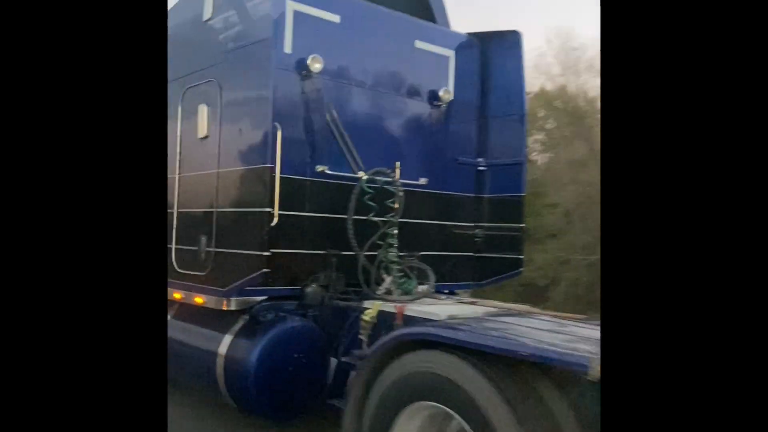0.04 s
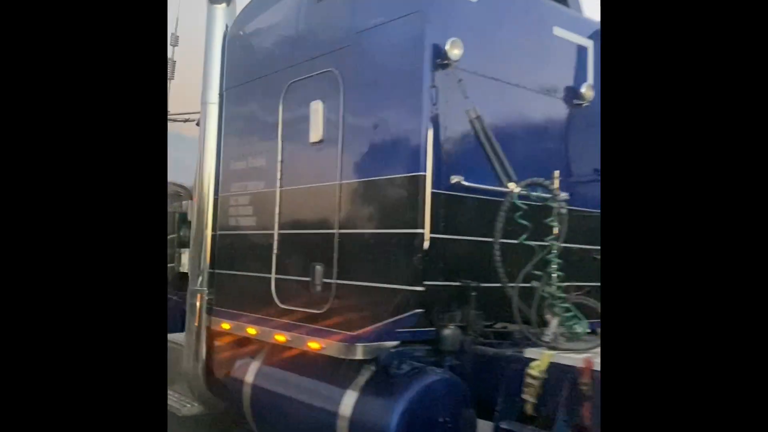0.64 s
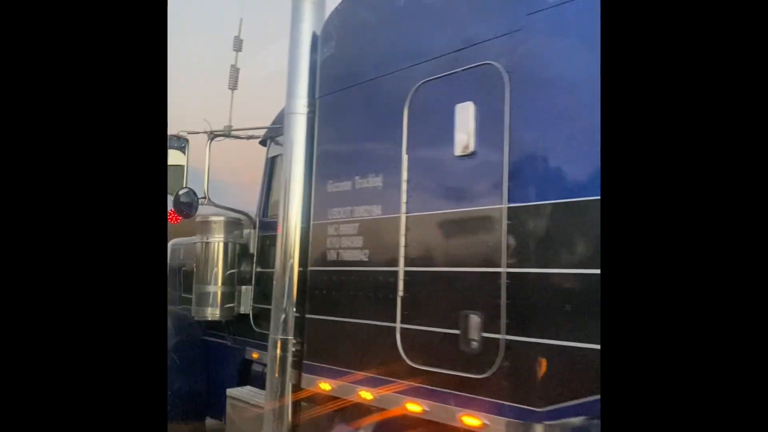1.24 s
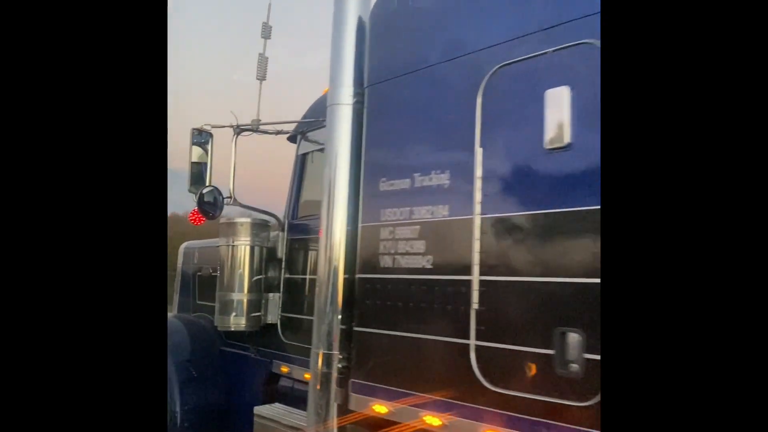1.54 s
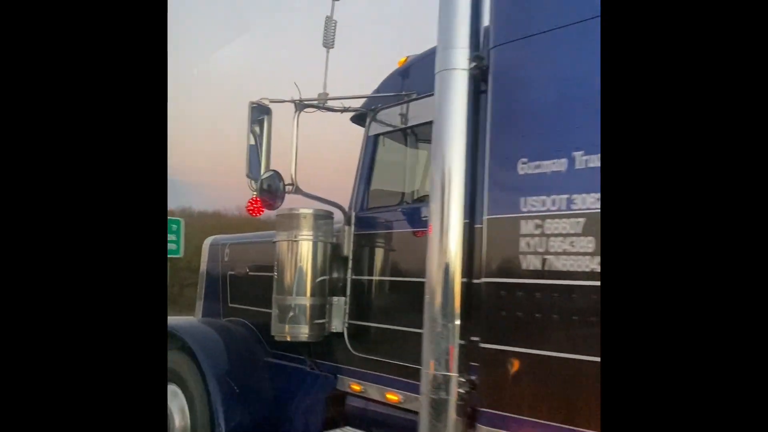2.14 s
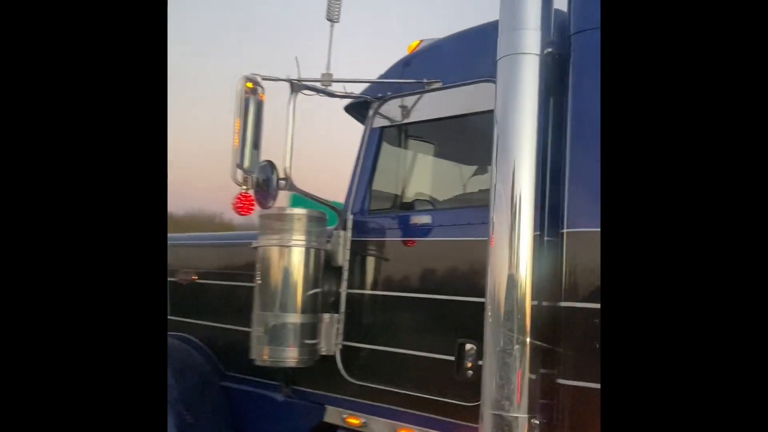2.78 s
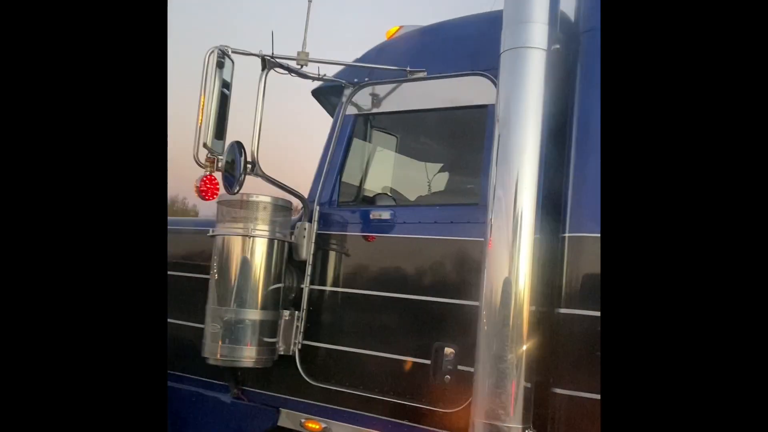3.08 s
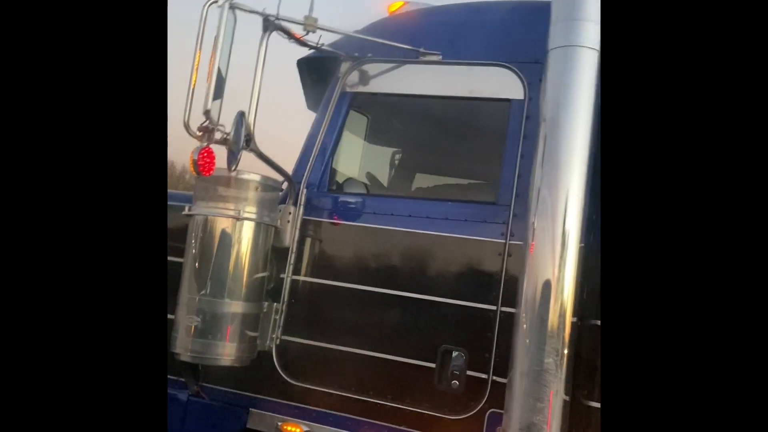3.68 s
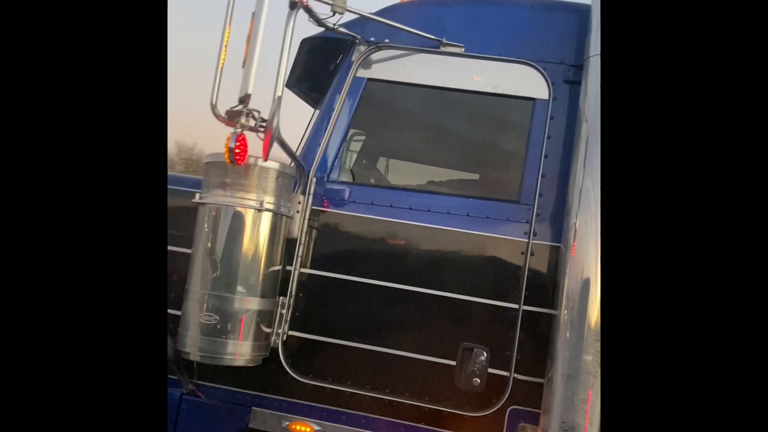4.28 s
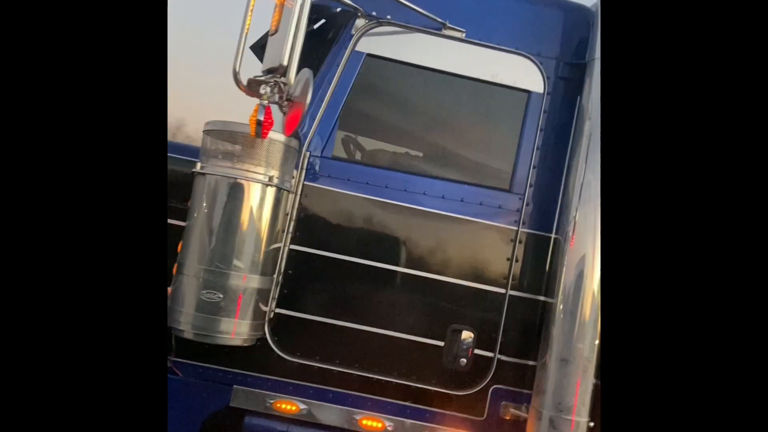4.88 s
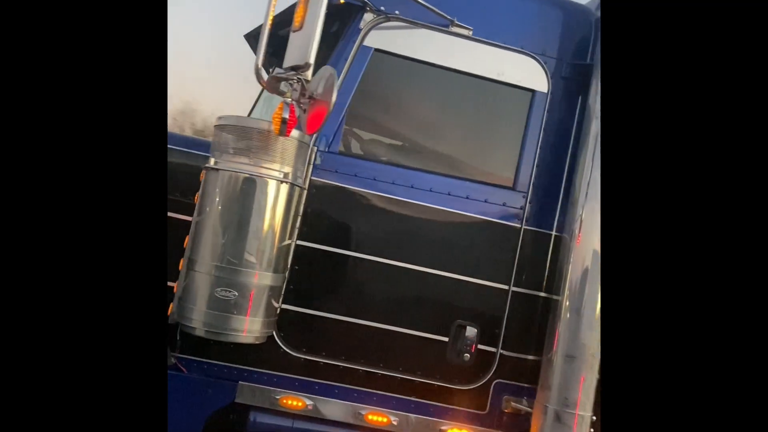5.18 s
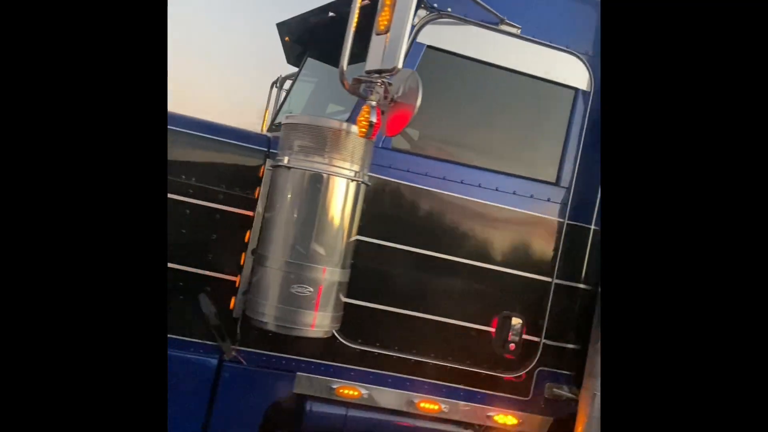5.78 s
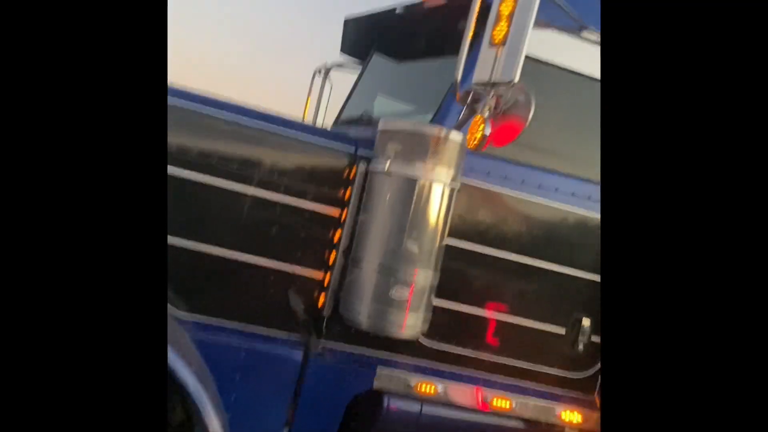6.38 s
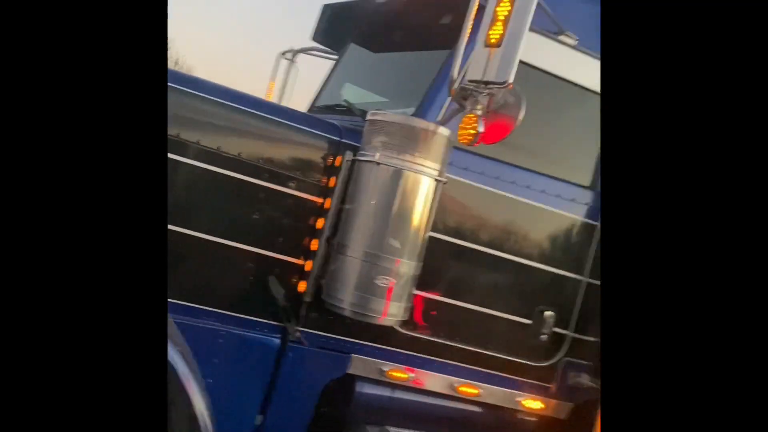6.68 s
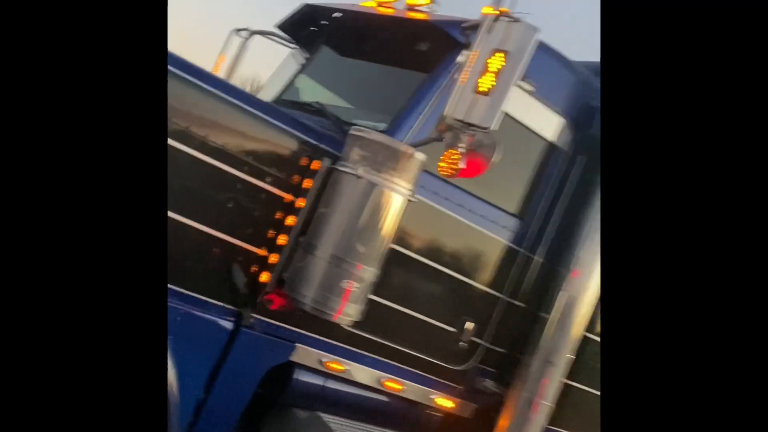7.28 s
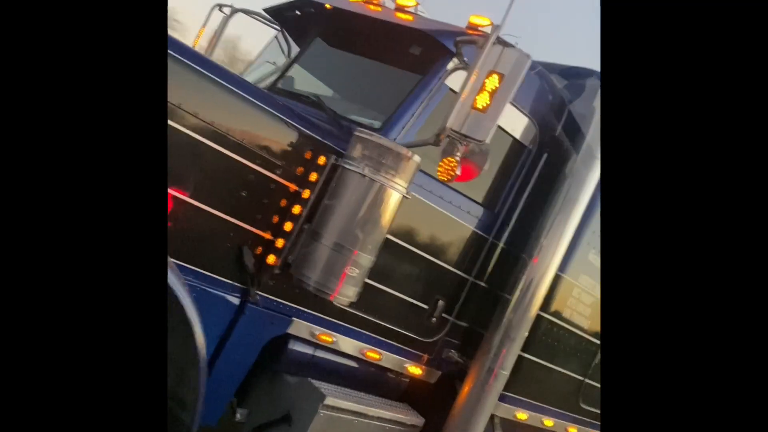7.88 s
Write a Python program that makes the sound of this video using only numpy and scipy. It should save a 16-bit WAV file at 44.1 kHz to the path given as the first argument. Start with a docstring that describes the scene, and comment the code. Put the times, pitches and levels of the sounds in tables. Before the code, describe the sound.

From inside a car at highway speed, low road rumble, tyre roar and wind mix with the steady exhaust drone of a truck close by. A faint turbo whistle rises and the truck's tyre howl drops behind. Then its air horn sounds two loud, rasping blasts, a long one and a shorter one in quick succession, with the engine and road still running underneath.

```python
"""A diesel truck runs alongside on a highway, heard from a moving car. From the start its exhaust drones
over tyre roar and wind while the turbo whistle climbs; small squeaks, chirps and later ticks sound in
the car. After 3 s the howl of the drive tyres drops behind. At 5.4 s and 6.9 s the driver pulls the air
horn: three reed trumpets sound a chord whose partials swell and fade as the paths between the vehicles
shift. Meanwhile the turbo runs down and the road noise eases."""
import sys
import numpy as np
from scipy import signal
from scipy.fft import irfft, next_fast_len
from scipy.io import wavfile
from scipy.ndimage import uniform_filter1d

SR = 44100
rng = np.random.default_rng(int(sys.argv[2]) if len(sys.argv) > 2 else 0)


def transcribe(u):
    """Save the signal u as a 16-bit wav file named by the first command-line argument.

    u: samples, shape (n,) or (channels, n), limited to [-1, 1]; the rate is SR.
    q: integer samples, one column per channel.
    """
    v = np.clip(np.atleast_2d(u).T, -1, 1)
    q = np.round(v * 32767).astype(np.int16)
    wavfile.write(sys.argv[1], SR, q)


N = 358533
TIME = np.arange(N) / SR
FREQS = np.maximum(np.fft.rfftfreq(next_fast_len(N, True), 1 / SR), 1)

LOW_HZ, MID_HZ, HIGH_HZ = 319.9, 386.3, 489.9  # the three trumpets
ABREAST_S = 6.1  # the horns are level with the car

# Table levels are relative: each source applies further gains.
# horn blasts: (valve opens [s], valve shuts [s], softness of the start [0-1])
BLASTS = [(5.411, 6.739, 0.95), (6.949, 7.746, .05)]
# the car crosses one lobe or null of each low partial's field; a row per partial, lowest first:
# (level outside [dB], gain at centre [dB], centre time [s], half-length [s])
LOW_PARTIALS = [(-26, -13, 7.71, 0.63), (-46, 14, 6.5, 0.37), (-33.5, -6.5, 6.72, 0.29),
                (-45.5, 10, 5.8, 0.5), (-50, 6, 6.05, 0.93)]
MID_PARTIALS = [(-17.5, 4, 6.09, .62), (-28.5, -11, 6.91, 0.52), (-47, 16.5, 5.81, 0.4),
                (-36, -15.5, 6.6, 0.16)]
HIGH_PARTIALS = [(-23, -4, 6.58, .37), (-33.5, 7, 5.97, 0.44), (-37.5, -4.5, 7.75, 0.44)]
# spectral envelopes of the upper partials: (frequency [Hz], level [dB])
LOW_BRASS = [(1920, -6), (2240, -11.5), (2560, -13.5), (2880, -19), (3200, -16), (3520, -22.5), (3830, -19),
             (4160, -23.5), (4500, -27.5), (6000, -32), (7400, -45.5)]
MID_BRASS = [(1930, -4.5), (2320, -8.5), (2700, -13), (3100, -23), (3470, -18), (3860, -14), (4250, -22.5),
             (4630, -27.5), (5800, -39.5), (7400, -51)]
HIGH_BRASS = [(1960, -6), (2450, -7), (2940, -8.8), (3430, -19), (3920, -16.5), (4400, -24), (5400, -27.5),
              (7400, -46)]
# bands of partials that briefly swell or fade:
# (frequency [Hz], half-width [Hz], gain [dB], centre time [s], half-length [s])
HORN_SWELLS = [(320, 30, 3.5, 7.0, .08), (386, 25, 2, 6.0, .12), (490, 30, 0, 5.8, .12),
               (490, 30, 1.5, 7.3, .15), (772, 50, -6, 5.92, 0.15), (772, 50, 0, 5.65, .2),
               (772, 50, -4.5, 6.52, .07), (772, 50, 2.5, 7.62, .15), (970, 70, -10, 5.45, 0.067),
               (970, 70, -7, 5.94, .07), (970, 70, 3, 6.28, 0.11), (970, 70, 3, 7.3, 0.073),
               (970, 70, -5, 7.67, 0.13), (1278, 50, 5, 7.63, .13), (1460, 35, -4.5, 5.52, .07),
               (1471, 35, -7, 6.13, .06), (1471, 35, -5, 8.2, .1), (1471, 35, 6, 7.07, .06),
               (1471, 35, -4.5, 7.23, .04), (1540, 50, -10, 5.1, 0.099), (1575, 45, -4.5, 9.5, .07),
               (1550, 50, -8, 7.35, 0.48), (1900, 300, 3.5, 5.52, 0.21), (1940, 150, -4.5, 5.7, 0.12),
               (1940, 100, 4.5, 6.53, 0.15), (1940, 120, 4, 7.72, .05), (2410, 200, -3, 5.46, .1),
               (2450, 60, 4.5, 6.5, .06), (2630, 100, 0.5, 5.98, .13), (2330, 120, -2, 7.1, 0.14),
               (2250, 70, 7.5, 7.35, .4), (2450, 60, 10, 7.6, .22), (2820, 190, 6, 7.55, .22),
               (3880, 110, -5.5, 7.1, .65), (4900, 1200, 2.5, 5.8, .35)]
# air rushing through the horns: (frequency [Hz], density level [dB])
RASP_SPECTRUM = [(200, -46.5), (500, -33.5), (700, -19), (880, -30), (1400, -29.5), (1750, -36.5),
                 (2150, -35.5), (2700, -38.5), (3400, -45.5), (4300, -46.5), (4900, -52.5), (5900, -53),
                 (7200, -68), (8000, -83.5), (15000, -89)]
# crankshaft speed: (time [s], rate [turns/s])
CRANK_SPEED = [(0, 24.8), (1.2, 24), (3.3, 23.8), (4.3, 24), (5.2, 24.2), (6.2, 24.42), (7.2, 24.3),
               (8.1, 24.1)]
# exhaust drone: (time [s], level [dB])
DRONE_LEVEL = [(0, -25), (1.2, -18.5), (4.2, -18), (5.3, -17), (6.4, -18.5), (8.1, -19)]
# engine orders, swelling as their lobes sweep over the car:
# (multiple of crank rate [1], level [dB], gain at centre [dB], centre time [s], half-length [s])
ENGINE_ORDERS = [(3, -17, 1.5, 2.5, 1), (5, -20.5, 4, 3.3, 1), (6, 0.5, 0, 4, 4),
                 (9, -24.5, 13, 3.15, 0.69), (10, -21.5, 10, 4.3, 1.8), (29, -31.5, 7.5, 1.3, 2.3)]
# turbo whistle: (time [s], frequency [Hz], level [dB])
TURBO_WHISTLE = [(0, 5300, -84), (1.0, 5450, -77.5), (2.2, 5660, -72.5), (3.08, 5776, -75),
                 (3.2, 5795, -63), (3.33, 5830, -76), (3.7, 5900, -78), (4.2, 5980, -79),
                 (4.5, 6020, -70.5), (5.6, 6287, -75), (6.5, 6050, -79.5), (8.1, 5520, -85)]
# road noise: (time [s], cabin rumble level [dB], tyre roar level [dB])
ROAD_LEVELS = [(0, 0.5, 1.6), (2.2, 0.7, 1.9), (3.2, 0.2, 0.85), (5.3, .5, 1.04), (6.1, -0.5, -3),
               (6.85, -3.5, -3.5), (8.1, -4, -4)]
# cabin rumble, tyre roar and wind: (frequency [Hz], density level [dB])
RUMBLE_SPECTRUM = [(15, -70), (25, -56.5), (42, -49), (58, -43.5), (75, -41.5), (90, -43.5), (112, -41.5),
                   (130, -47), (175, -45), (250, -47), (310, -54), (400, -61.5), (800, -88), (2000, -130)]
ROAR_SPECTRUM = [(120, -81.5), (320, -63.5), (400, -55.5), (470, -60), (620, -57.5), (710, -57.5),
                 (830, -63.5), (950, -66.5), (1100, -68.5), (1400, -74.5), (1750, -78.5), (2600, -91.5),
                 (6000, -130)]
WIND_SPECTRUM = [(300, -97.5), (1400, -74), (2100, -80.5), (2700, -80), (3400, -82), (4200, -89),
                 (5000, -94.5), (5700, -93), (6100, -100), (6600, -102), (7300, -109), (8200, -120),
                 (10000, -119), (11500, -123), (15000, -127)]
# howl of the truck's drive tyres: (time [s], level [dB])
HOWL_LEVEL = [(0, -45.5), (.9, -37), (3, -39), (4.2, -49), (8.1, -53.5)]
# tread tones: (frequency [Hz], width [Hz], level [dB], level slope [dB/s])
TREAD_TONES = [(551, 18, -37, -0.22), (707, 24, -43, -1.5), (806, 26, -44, -.5), (907, 12, -47.5, -1.1),
               (1016, 14, -50, -0.5), (1193, 24, -51, -0.2), (1402, 36, -56, -1.5)]
# their common drift: (time [s], pitch factor [1])
TREAD_PITCH = [(0, 0.99), (1.8, 1.02), (2.8, .997), (8.1, 1.01)]
# ticks: (time [s], level [dB], frequency [Hz], relative width [1], decay [s], left minus right [dB])
TICKS = [(4.157, -29.5, 4400, 0.14, 0.0023, 3), (4.159, -32, 6040, 0.11, 0.0019, -1),
         (5.461, -45, 5200, 0.25, 0.0025, -2), (7.163, -51, 5800, 0.25, 0.002, 3),
         (7.363, -42, 4200, 0.4, 0.0022, 9), (7.569, -37, 3900, 0.54, 0.003, 10)]
# squeaks: (time [s], half-length [s], level [dB], frequency [Hz], relative width [1])
SQUEAKS = [(0.167, .035, -51, 3450, .05), (0.256, .025, -48.5, 3400, .08), (1.28, 0.037, -49, 3050, 0.11),
           (1.27, 0.054, -54, 4100, 0.19), (1.255, .06, -61, 6760, 0.093), (1.705, .028, -49.5, 3500, .25),
           (1.752, .02, -48.5, 3380, .28), (1.856, 0.019, -42.5, 3440, .17), (1.865, .045, -57, 4500, .3),
           (1.91, .03, -51, 3400, 0.11), (2.116, 0.037, -48.5, 3800, .13), (4.608, 0.043, -50, 3550, .1),
           (5.66, .03, -49, 2499, .12), (6.125, .018, -43, 2700, .22)]
# chirps: (time [s], half-length [s], level [dB], frequency [Hz], glide [octaves/s])
CHIRPS = [(0.067, 0.012, -32, 940, -27.5), (0.572, 0.0079, -26.5, 905, 0.5), (1.112, .01, -24.5, 662, -19),
          (5.803, .016, -28, 658, -7), (5.874, 0.011, -24, 684, 0)]
# thin whine: (frequency [Hz], level [dB])
WHINE_TONES = [(11860, -88.5), (12150, -87.5)]
# stereo width of noise: (frequency [Hz], side minus mid [dB])
STEREO_WIDTH = [(60, -28), (200, -16.5), (420, -14.5), (650, -4.5), (1000, -2), (1700, -9), (2600, 0),
                (4200, -1.5), (8000, 13)]


def air_horn():
    """Superposition: three trumpets on one air line sound a rasping chord."""
    low = trumpet(LOW_HZ, LOW_PARTIALS, LOW_BRASS, pan_db=1.5, soft_db=-3.0)
    mid = trumpet(MID_HZ, MID_PARTIALS, MID_BRASS, pan_db=-1.5, soft_db=-6)
    high = trumpet(HIGH_HZ, HIGH_PARTIALS, HIGH_BRASS, pan_db=-3.0, soft_db=-0.5)
    return low + mid + high + rasp()


def trumpet(hz, partials, brass, pan_db, soft_db, warm_up_s=0.24, blare_hz=2400,
            flutter_rad=0.53, ear_rad=1.23, right_lead_s=0.00006):
    """A periodic reed gives a harmonic series; turbulence scatters the shortest waves most."""
    live = TIME > BLASTS[0][0]
    t = TIME[live]
    phase = cycle(hz * horn_pitch() * (1 + 0.0011 * walk(45)))[live]
    start_db = soft_db * sum(soft * settling(on, warm_up_s) for on, _, soft in BLASTS)
    low_modes = []
    for k, (db, lobe_db, s, half_s) in enumerate(partials, 1):
        # the low partials start together; the lowest ring on longest
        envelope = valve(rise_s=0.014, fall_s=0.03 / k ** 0.67, linger_s=0.0041 / k ** 2)
        low_modes.append((undb(db + start_db / k + lobe_db * lobe(TIME, s, half_s)) * envelope)[live])
    blare = undb(-39.5 - 4 * (t - ABREAST_S))  # falls as the horn mouths turn away
    pressure = valve(rise_s=0.021, fall_s=0.018)[live]
    slow, fast = walk(10), walk(70)
    swells = [(f, half_hz, db * lobe(t, s, half_s)) for f, half_hz, db, s, half_s in HORN_SWELLS]

    def eddies(motion):
        """Decorrelation: each path meets the turbulence at its own random delay."""
        return np.roll(motion, rng.integers(N))[live]

    out = np.zeros((2, N))
    for k in range(1, int(7400 / hz) + 1):
        partial_hz = k * hz
        scatter = min((partial_hz / 2700) ** 1.5, 2.2)
        shared_phase = k * phase + 2 * np.pi * rng.random() + flutter_rad * scatter * eddies(fast)
        if k <= len(low_modes):
            amplitude = low_modes[k - 1]
        else:  # higher partials need more pressure: they arrive later and leave sooner
            amplitude = undb(spectrum_db(brass, partial_hz)) * blare * pressure ** (partial_hz / blare_hz)
        swell_db = sum(lobe(partial_hz, f, half_hz) * swell for f, half_hz, swell in swells)
        ripple_db = 1.5 * min(partial_hz / 2400, 1) * eddies(slow)
        amplitude = amplitude * undb(swell_db + ripple_db)
        sides = pan(pan_db if partial_hz < 1200 else 0.5)
        for ear in range(2):
            fade = sides[ear] * undb(2.8 * min(scatter, 1) * eddies(slow))
            lead = ear * 2 * np.pi * partial_hz * right_lead_s
            wander = scatter * (ear_rad * eddies(slow) + flutter_rad * eddies(fast))
            out[ear, live] += amplitude * fade * np.sin(shared_phase + lead + wander)
    return np.sqrt(2) * out


def valve(rise_s, fall_s, linger_s=0):
    """Exponential relaxation: horn pressure (0-1) builds as the valve opens and drains once it shuts."""
    return sum((1 - np.exp(-np.maximum(TIME - on, 0) / rise_s))
               * np.exp(-np.maximum(TIME - off - linger_s, 0) / fall_s) for on, off, _ in BLASTS)


def horn_pitch(sharp=0.01998, settle_s=0.0583, sink_per_s=0.0013):
    """Onset transient: each blast starts sharp; the pitch factor also sinks as the vehicles draw level."""
    onsets = sum(settling(on, settle_s) for on, _, _ in BLASTS)
    return 1 + sharp * onsets - sink_per_s * (TIME - ABREAST_S)


def rasp(puff_depth=0.96):
    """Amplitude modulation: each reed releases its rushing air in puffs, once a cycle."""
    puffs = sum(np.exp(puff_depth * np.cos(cycle(hz * horn_pitch()))) for hz in (LOW_HZ, MID_HZ, HIGH_HZ))
    level_db = -39 - 5 * (TIME - ABREAST_S)  # falls as the horn mouths turn away
    level_db += 4 * lobe(TIME, 7.6, 0.27)  # a late swell
    air = wide_noise(RASP_SPECTRUM) * valve(rise_s=0.046, fall_s=0.012) * undb(level_db + 2 * walk(60))
    return air * puffs / np.sqrt(np.mean(puffs ** 2))


def engine(waver_db=2.5, slip_rad=0.33):
    """Harmonics of rotation: six cylinders fire three times a turn; the exhaust booms on order six."""
    crank_angle, out = cycle(curves(CRANK_SPEED)[0]), 0
    for order, order_db, lobe_db, s, half_s in ENGINE_ORDERS:
        unsteady = order_db < -6  # only the weaker orders waver
        slip = unsteady * slip_rad * walk(7) + 2 * np.pi * rng.random()
        level_db = order_db + lobe_db * lobe(TIME, s, half_s) + unsteady * waver_db * walk(6)
        out += undb(level_db) * np.sin(order * crank_angle + slip)
    return np.sqrt(2) * out * undb(curves(DRONE_LEVEL)[0]) * pan(1.0)


def turbo(gain_db=6.0, jitter_hz=42):
    """A rotor's tone follows its speed: the whistle rises while the truck pulls, then runs down."""
    hz, db = curves(TURBO_WHISTLE)
    ears = [undb(db + gain_db + 3 * walk(12)) * np.sin(cycle(hz + jitter_hz * walk(250)))
            for _ in range(2)]
    return np.sqrt(2) * np.array(ears)


def road(howl_hz=880, wind_db=-3.5):
    """Incoherent sources add in power: cabin rumble, tyre roar, tread, drive-tyre howl and wind."""
    rumble_db, roar_db = curves(ROAD_LEVELS)
    rumble = wide_noise(RUMBLE_SPECTRUM) * undb(rumble_db + 0.48 * walk(14)) * pan(0.5)
    roar = wide_noise(ROAR_SPECTRUM) * undb(roar_db + 0.56 * walk(11)) * pan(-0.64)
    howl = noise(resonance(howl_hz, width_hz=240)) * undb(curves(HOWL_LEVEL)[0] + walk(15))
    wind = wide_noise(WIND_SPECTRUM) * undb(wind_db + roar_db + 0.72 * walk(15)) * pan(-0.3)
    return rumble + roar + tread() * undb(roar_db) + howl + wind


def tread(reference_s=1.9):
    """Repeated impacts of tread blocks give narrow, unsteady tones that fade as the wheels drop behind."""
    out, pitch = 0, curves(TREAD_PITCH)[0]
    for hz, width_hz, db, db_per_s in TREAD_TONES:
        phase = cycle(hz * pitch)
        band = walk(width_hz) * np.sin(phase) + walk(width_hz) * np.cos(phase)
        out += undb(db + db_per_s * (TIME - reference_s)) * band
    return out


def ticks(contact_s=0.00028):
    """Damped resonance: small hard contacts in the car ring and decay exponentially."""
    out = np.zeros((2, N))
    for s, db, hz, width, decay_s, pan_db in TICKS:
        age = np.maximum(TIME - s, 0)
        ring = (1 - np.exp(-(age / contact_s) ** 2)) * np.exp(-age / decay_s)
        out += undb(db) * ring * noise(resonance(hz, width * hz)) * pan(pan_db)
    return out


def squeaks(scratch_db=2.0):
    """Random amplitude modulation makes faint bursts of narrow-band noise sound scratchy."""
    out, scratch = 0, undb(scratch_db * walk(120))
    for s, half_s, db, hz, width in SQUEAKS:
        envelope = np.exp(-2 * ((TIME - s) / half_s) ** 2)
        out += undb(db) * envelope * scratch * noise(resonance(hz, width * hz))
    return out


def chirps():
    """Frequency sweeps under Gaussian envelopes: short low chirps close by."""
    out = 0
    for s, half_s, db, hz, octaves_per_s in CHIRPS:
        glide = 2 ** (octaves_per_s * np.clip(TIME - s, -half_s, half_s))
        envelope = np.exp(-((TIME - s) / half_s) ** 2)
        out += undb(db) * envelope * np.sin(cycle(hz * glide))
    return np.sqrt(2) * out


def whine():
    """Two very faint, high pure tones of constant frequency waver in level."""
    tones = (undb(db + 1.5 * walk(5)) * np.sin(2 * np.pi * hz * TIME) for hz, db in WHINE_TONES)
    return np.sqrt(2) * sum(tones)


def wide_noise(spectrum):
    """Interaural coherence: long waves reach both ears alike, short ones differ."""
    mid_gain = undb(spectrum_db(spectrum, FREQS))
    side_gain = mid_gain * undb(spectrum_db(STEREO_WIDTH, FREQS))
    mid, side = (noise(g) * np.sqrt(np.mean(g ** 2) * SR / 2) for g in (mid_gain, side_gain))
    return mid + side * np.array([[1], [-1]])


def noise(gain):
    """Fourier synthesis of noise with rms 1, shaped by a gain at each frequency."""
    x = irfft(gain * (rng.standard_normal(len(FREQS)) + 1j * rng.standard_normal(len(FREQS))))[:N]
    return x / x.std()


def resonance(hz, width_hz):
    """Frequency response of a steep resonance."""
    return 1 / (1 + ((FREQS ** 2 - hz ** 2) / (FREQS * width_hz)) ** 2)


def walk(rate_hz):
    """Smooth random fluctuation with a spread near 1."""
    knots = np.arange(int(N / SR * rate_hz) + 3)
    x = np.interp(TIME * rate_hz + rng.random(), knots, rng.standard_normal(len(knots)))
    return 1.3 * uniform_filter1d(x, max(int(SR / rate_hz / 2), 1))


def lobe(x, centre, half):
    """A flat-topped lobe: 1 at the centre, 0.5 at a distance of half."""
    return 1 / (1 + np.square(np.square((x - centre) / half)))


def settling(on, settle_s):
    """Exponential decay from 1 as the valve opens."""
    return (TIME >= on) * np.exp(-np.maximum(TIME - on, 0) / settle_s)


def cycle(hz):
    """Phase in radians, the integral of frequency."""
    return 2 * np.pi * np.cumsum(hz) / SR


def curves(table):
    """Linear interpolation of a table's columns in time."""
    s, *columns = np.transpose(table)
    return [np.interp(TIME, s, column) for column in columns]


def spectrum_db(spectrum, hz):
    """Interpolation of level on a log-frequency axis."""
    f, db = np.transpose(spectrum)
    return np.interp(np.log(hz), np.log(f), db)


def pan(db):
    """Interaural level difference as left and right gains."""
    return undb(np.array([[db], [-db]]) / 2)


def undb(db):
    """Decibels to amplitude ratio."""
    return 10 ** (np.asarray(db) / 20)


def scene():
    """Superposition of all sources at the car's side window."""
    return engine() + turbo() + road() + air_horn() + ticks() + squeaks() + chirps() + whine()


def record(dry, cutoff_hz=15700):
    """A steep low-pass filter removes the highest treble."""
    return signal.sosfilt(signal.ellip(8, 0.2, 70, cutoff_hz, fs=SR, output="sos"), dry)


dry = scene()
out = record(dry)
transcribe(out)
```